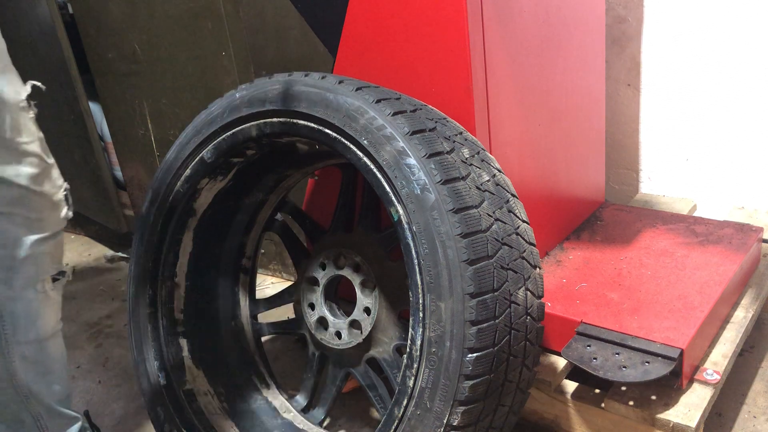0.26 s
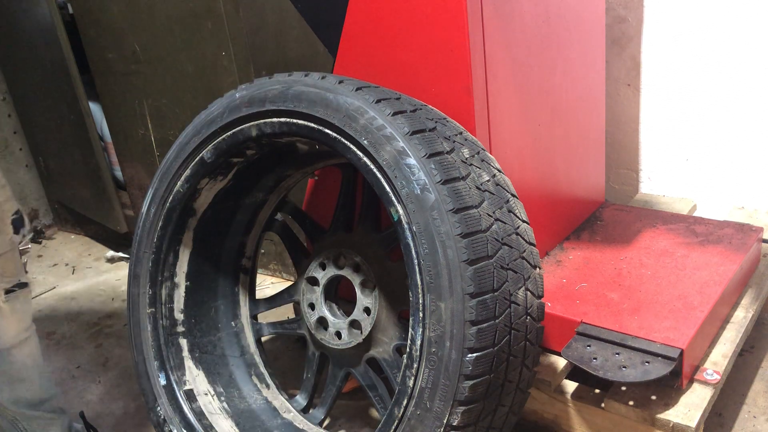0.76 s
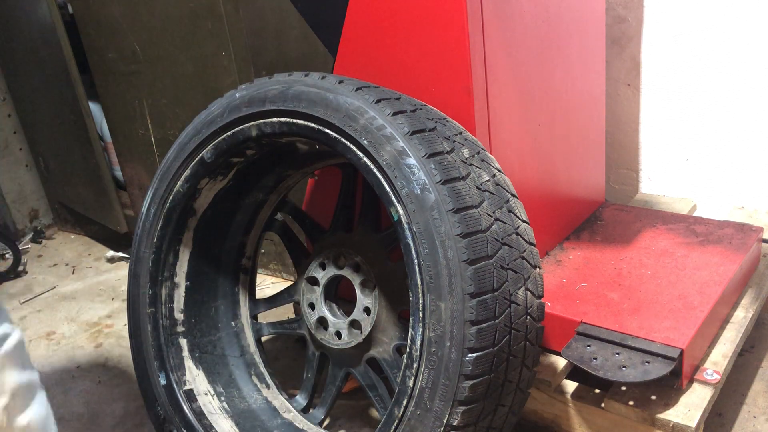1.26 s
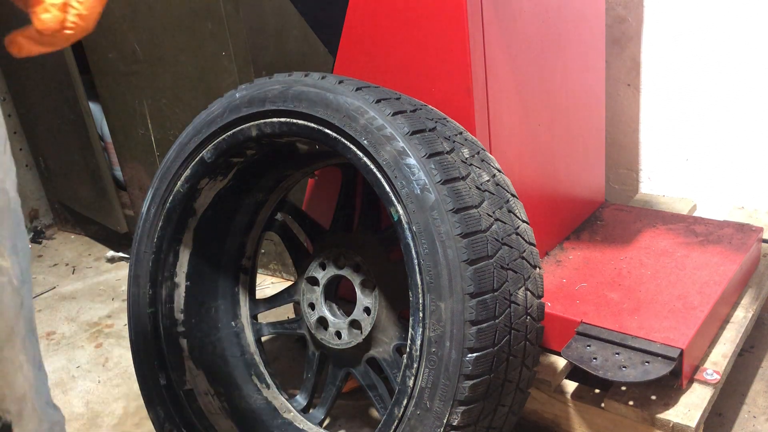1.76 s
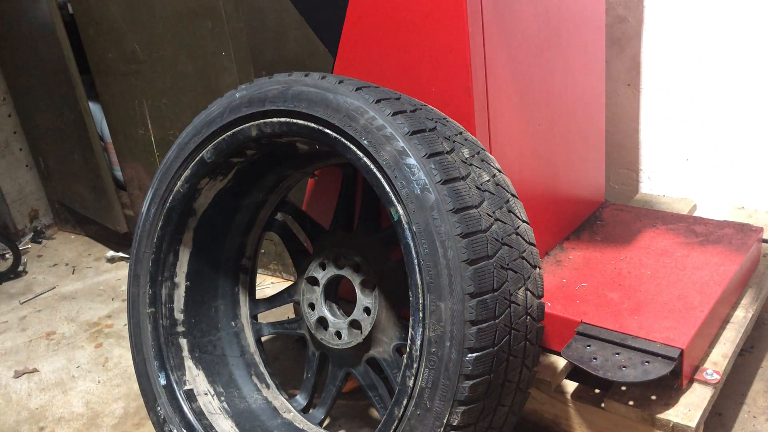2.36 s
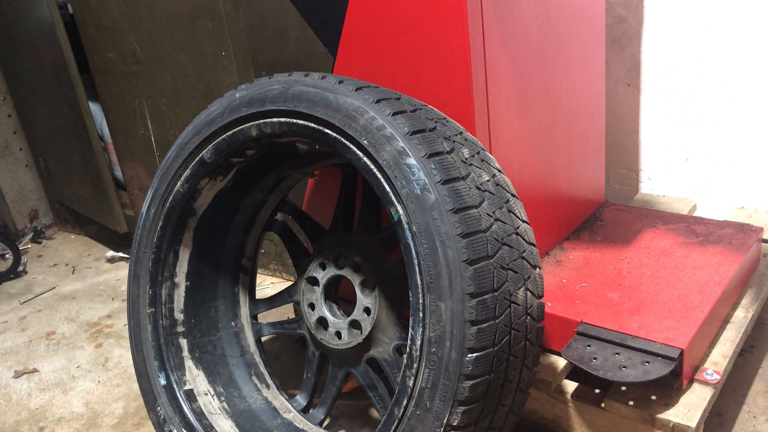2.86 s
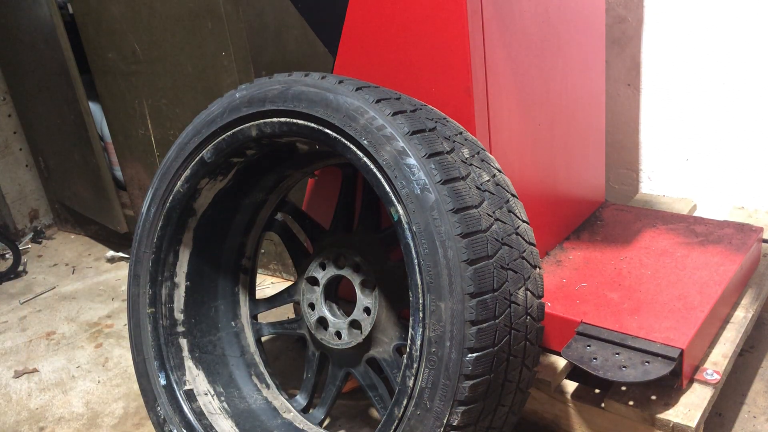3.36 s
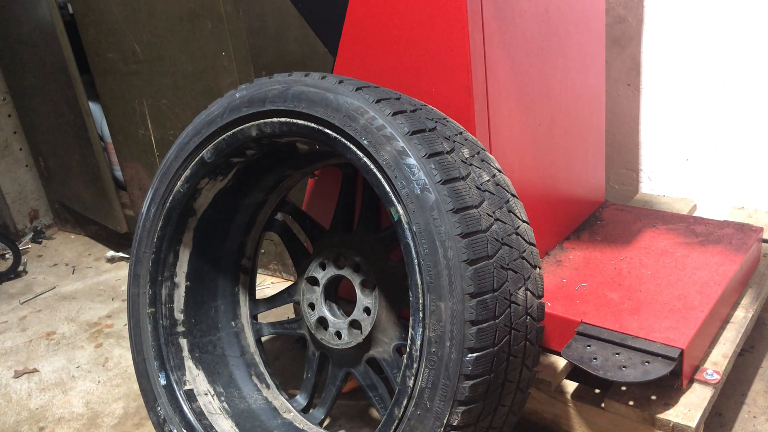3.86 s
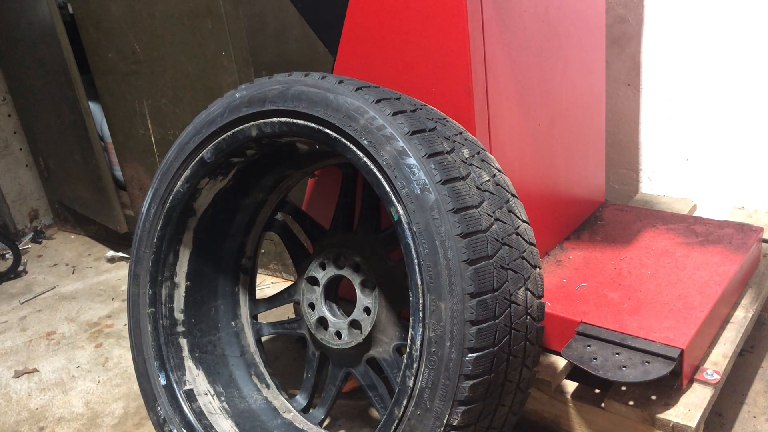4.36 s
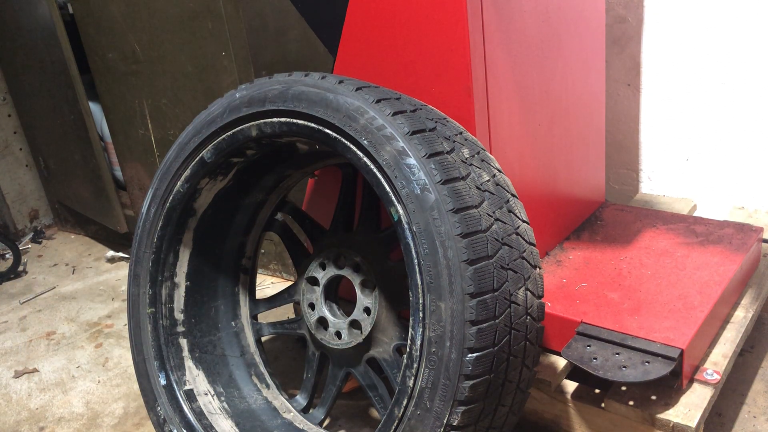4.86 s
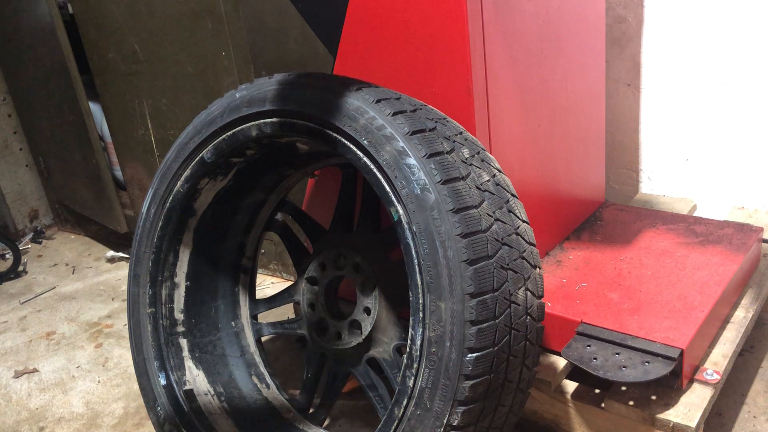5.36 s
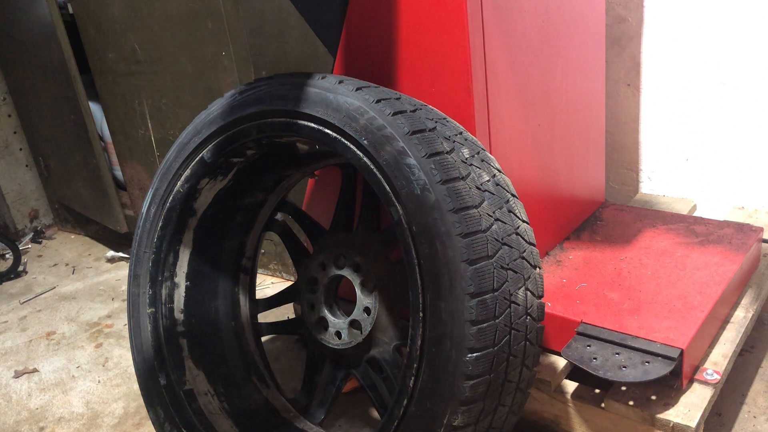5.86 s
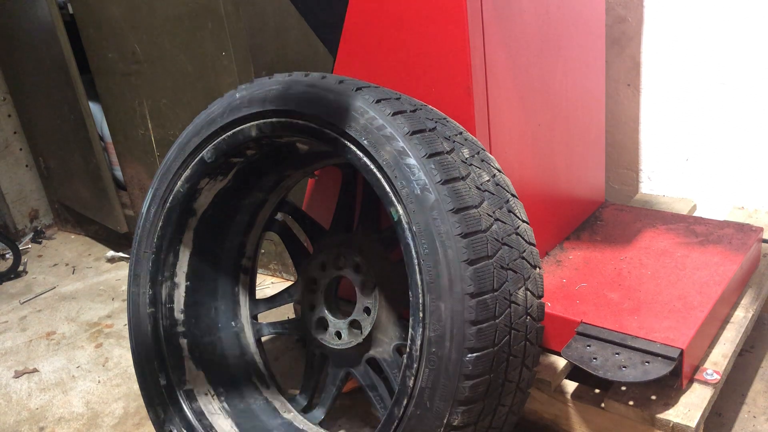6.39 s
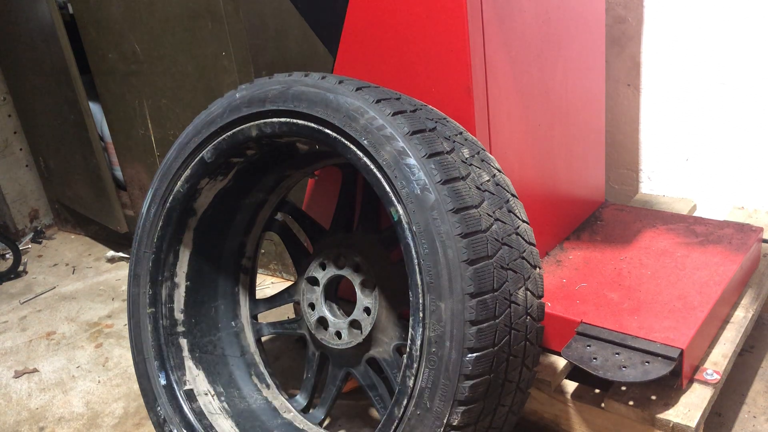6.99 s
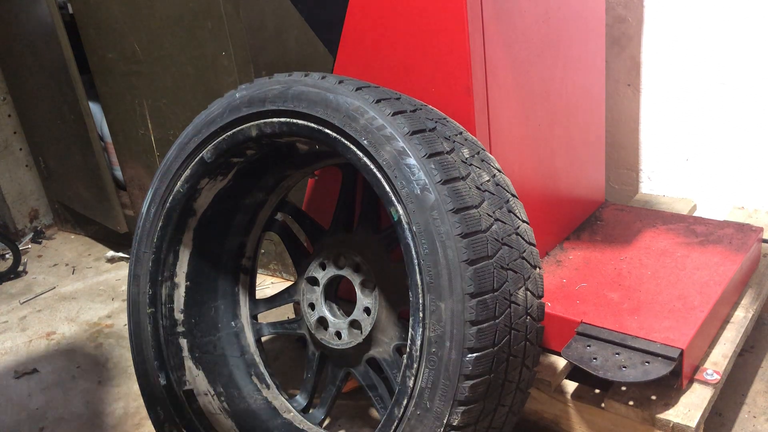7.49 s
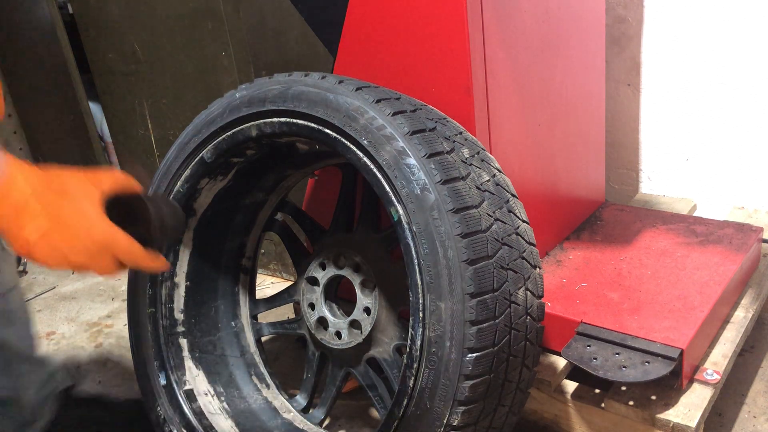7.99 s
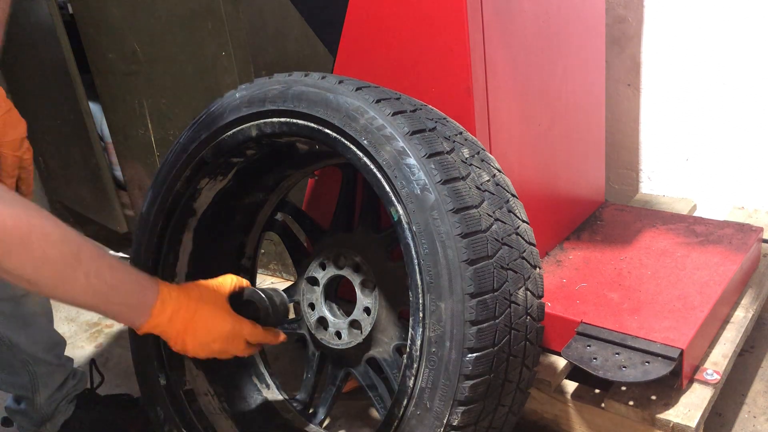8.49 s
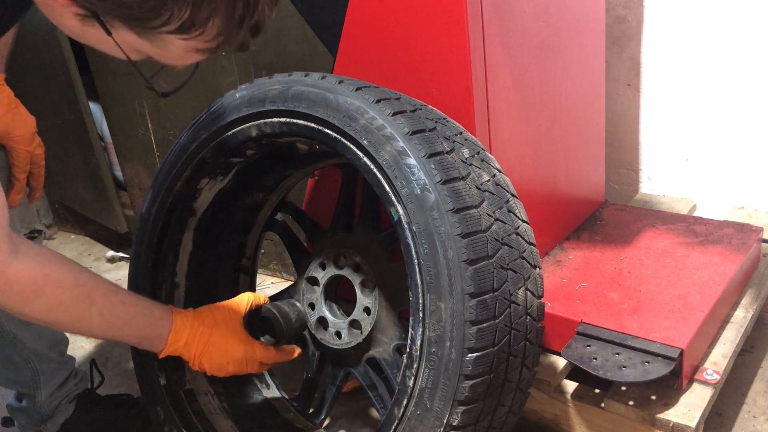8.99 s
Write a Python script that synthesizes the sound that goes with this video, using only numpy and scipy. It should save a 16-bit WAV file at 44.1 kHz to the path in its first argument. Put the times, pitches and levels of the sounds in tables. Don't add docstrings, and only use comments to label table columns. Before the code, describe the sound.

A small concrete workshop heard through a slightly hissy phone microphone, very quiet behind with distant rumble, a wavering low motor hum and rustling clothes. From 0.2 s shoes shuffle on grit, with firm crunching steps at 0.6 and 0.95 s, a sharp stone crack and a brief high rubber squeak just before 0.9 s. Lighter scuffs follow, a drag around 2.4 s, then at 2.8-3.1 s steps bump a pallet and tyre, giving hollow, beating low thuds and knocks. A thin air hiss swells near 3.3 s. Another crisp step cracks stones at 4.1 s; knocks come at 5.35 s and a round low bump at 6.15 s. Crunches at 6.45 and 6.75 s lead to the loudest event, a hard gritty stamp at 7.7 s. Small ticks and scrapes continue until 8.4 s, then only faint background remains.

```python
import sys
import numpy as np
from scipy import signal
from scipy.fft import rfft, irfft
from scipy.io import wavfile
from scipy.ndimage import uniform_filter1d

SR = 44100
rng = np.random.default_rng(int(sys.argv[2]) if len(sys.argv) > 2 else 0)


def natural_amplitude(level_db):
    exponent = np.asarray(level_db, float) / 20
    return 10 ** exponent


def to_wav(s):
    ch = np.atleast_2d(s).T
    pcm = np.round(np.clip(ch, -1, 1) * 32767)
    wavfile.write(sys.argv[1], SR, pcm.astype(np.int16))


N = 407464


def unit(x):
    return x / np.sqrt(np.mean(x ** 2))


def bandpass(x, lo_hz, hi_hz):
    sos = signal.butter(2, [lo_hz, hi_hz], "bandpass", fs=SR, output="sos")
    return signal.sosfilt(sos, x)


def band(x, lo_hz, hi_hz):
    return unit(bandpass(x, lo_hz, hi_hz))


def walk(rate_hz):
    hold = int(SR / rate_hz)
    held = np.repeat(rng.standard_normal(N // hold + 1), hold)
    return unit(uniform_filter1d(held, hold)[:N])


def add(out, s, x):
    i = int(s * SR)
    out[i:i + len(x)] += x[:N - i]


def swells(rows, rest_db):
    t = np.arange(N) / SR
    power = natural_amplitude(rest_db) ** 2
    for s, db, half_s in rows:
        power = power + natural_amplitude(db) ** 2 * np.exp(-2 * ((t - s) / half_s) ** 2)
    return np.sqrt(power)


def grit(density, scatter_db):
    hit = rng.random(N) < density / SR
    size = rng.exponential(size=N)
    return hit * rng.standard_normal(N) * natural_amplitude(scatter_db * size)


# (pitch [Hz], level per Hz [dB])
HISS_SLOPE = [(15, -62), (25, -3.5), (114, -6.5), (145, -7.5), (309, -15.5), (476, -17.5), (695, -20.5),
              (1160, -20.5), (1330, -24), (1940, -21), (2480, -25), (5730, -19), (8140, -23),
              (10400, -26.5), (16000, -23)]
# (pitch [Hz], width [Hz], boost [dB])
CAVITY_PEAKS = [
    (3910, 710, 5),
    (5790, 420, 1.5),
    (10470, 800, 8),
    (3030, 330, -3.5),
    (25.4, 20, -19),
    (13100, 1100, -1.5),
]


def microphone_colour(x):
    f = np.maximum(np.fft.rfftfreq(N, 1 / SR), 1)
    hz, db = np.transpose(HISS_SLOPE)
    colour = np.interp(np.log(f), np.log(hz), db)
    for centre, width, boost_db in CAVITY_PEAKS:
        colour += boost_db / (1 + (2 * (f - centre) / width) ** 2)
    return irfft(rfft(x) * natural_amplitude(colour), N)


def hiss():
    return unit(microphone_colour(rng.standard_normal(N))) * natural_amplitude(-65)


# (loudest at [s], level [dB], half length [s])
RUSTLES = [
    (.3, -67, 0.86),
    (1.36, -68.5, 0.13),
    (3.3, -67, 0.65),
    (4.15, -64.5, 0.38),
    (4.7, -67.5, 0.98),
    (6.8, -65, 0.46),
    (7.87, -64, .08),
    (8.3, -66, 0.14),
]


def clothes(rustle):
    return band(rustle, 456, 7600) * swells(RUSTLES, -70)


# (loudest at [s], level [dB], half length [s])
RUMBLES = [
    (.5, -74.5, 0.25),
    (1.6, -71, 0.77),
    (3.0, -71.5, 0.59),
    (4.4, -71.5, 0.99),
    (6.25, -68.5, 0.34),
    (7.3, -71.5, 1),
    (9.1, -77.5, 0.26),
]


def distant_rumble():
    return band(rng.standard_normal(N), 60, 460) * swells(RUMBLES, -79) * natural_amplitude(1.8 * walk(7.8))


# (loudest at [s], level [dB], half length [s])
HUMS = [
    (.8, -70, .4),
    (2.2, -69, 0.47),
    (2.75, -69, 0.62),
    (4.05, -70, 0.24),
    (5.1, -70.5, 0.45),
    (6.4, -70, .25),
    (7.8, -73, 0.15),
]


def motor_hum():
    tone = np.sin(2 * np.pi * np.cumsum(117 + 4.0 * walk(14)) / SR)
    return tone * natural_amplitude(1.5 * walk(12)) * swells(HUMS, -92)


# (loudest at [s], level [dB], half length [s])
LEAKS = [
    (3.3, -72, 0.7),
    (4.6, -77, .8),
    (8.9, -76, 0.46),
]


def air_leak(rustle):
    return band(rustle, 5050, 5700) * swells(LEAKS, -93)


def background():
    rustle = microphone_colour(grit(9000, 1.5))
    return hiss() + clothes(rustle) + distant_rumble() + motor_hum() + air_leak(rustle)


# (start [s], time to full weight [s], grit level [dB],
# rubber body over grit [dB], fine dust over grit [dB])
STEPS = [(.215, 0.0078, -60, -17, 0), (.592, 0.027, -46, -5, 2), (.62, 0.052, -44, -9, -6.5),
         (.921, 0.031, -43, -7, 0), (.95, 0.041, -46, -4, -5), (1.335, 0.044, -54.5, -1.5, -1),
         (1.64, 0.026, -54, -3, 1), (2.823, 0.029, -44.5, 0, -12), (3.075, 0.0098, -43, -8, -6.5),
         (3.862, .003, -60, 1.5, -20), (4.088, 0.042, -43.5, -6.5, -2), (4.125, 0.034, -46.5, -5, -3),
         (4.58, .006, -61, -4, 0.5), (5.527, 0.0086, -53.5, 2, -7), (5.54, 0.031, -54.5, -1, -2.5),
         (6.34, 0.027, -54.5, -5.5, -6), (6.44, 0.022, -44.5, -5, -6), (6.757, 0.0036, -50.5, -11, 0),
         (7.39, 0.031, -51.5, -11.5, -4), (7.735, 0.011, -46.5, 6, -5), (7.915, 0.0088, -52.5, -4, 0.5),
         (7.925, 0.017, -58.5, -0.5, 0), (8.129, 0.01, -50.5, -10, -8)]
SLIDES = [(.2, 0.062, -65, -3.5, 1), (.42, 0.039, -64.5, -8, -18), (.74, 0.069, -70.5, -4, 2),
          (1.09, 0.069, -74, 4, -10), (1.43, 0.021, -63.5, 0.5, -1), (1.47, .12, -59.5, -2.5, -1.5),
          (2.3, 0.1, -60, -3.5, 2.5), (2.39, 0.083, -50, -10.5, 2), (2.48, 0.066, -57.5, -3, 1),
          (3.18, 0.041, -66, -9, -5), (3.28, 0.11, -56, -3, -15), (3.52, 0.034, -67.5, -4, -8),
          (3.87, 0.037, -60, -5, -3), (4.59, 0.062, -65, -5, -14), (5.22, .05, -68, 1, -7),
          (6.56, 0.045, -68.5, 2, -9), (6.68, 0.036, -52.5, -9, -2.5), (6.72, 0.039, -59.5, -5, -3),
          (6.81, 0.069, -64, -5, -5), (7.24, 0.083, -61, -3, -1), (7.31, 0.092, -59.5, -10, -5),
          (7.8, 0.063, -57, -6, -10), (8.22, 0.094, -58.5, -10, -8), (8.33, 0.073, -67, -6, -4)]
STAMPS = [
    (7.698, 0.012, -38, -4, -8),
    (7.703, 0.024, -29, -8.5, -8),
]
# (start [s], time to full weight [s], grit level [dB],
# rubber body over grit [dB], weight on sole over grit [dB])
TREADS = [(.47, 0.023, -72.5, -14, 5.5), (.93, .02, -55.5, 0, -1), (1.338, .004, -64.5, 8, -5),
          (4.1, 0.036, -56, -6, 1.5), (6.44, 0.0027, -49.5, -4, -3.5), (1.76, 0.035, -77, 6, 7.5),
          (2.29, 0.025, -72.5, 7.5, 6), (2.87, 0.025, -52.5, 7.5, -8), (2.905, 0.013, -57.5, 7, 2),
          (4.02, .008, -60, -3.5, -2), (5.128, .003, -69.5, 7, 11), (5.334, 0.039, -59, 2, -4.5),
          (5.429, 0.013, -60, 2.5, -10), (6.007, .008, -61, -0.5, 1), (6.112, 0.017, -72.5, 12, 13.5),
          (7.151, .003, -61.5, 2.5, 4), (7.754, 0.0089, -46, 1, 5), (8.128, .003, -57.5, 1.5, 7.5)]
# (first contact below full level [dB], fading [dB per s])
STEP, SLIDE, TREAD = (-10, 215), (-12, 164), (-5.5, 228)
STAMP = (-27, 253)
FADE_SHARES = (1.01, 1.14, 1.025, 1.28)


def pressure():
    power, t = np.zeros((4, N)), np.arange(SR // 2) / SR
    moves = []
    for rows, kind in ((STEPS, STEP), (SLIDES, SLIDE), (STAMPS, STAMP)):
        for s, rise, db, body, dust in rows:
            moves.append((s, rise, db, (0, body - 12.5, body, dust), kind))
    for s, rise, db, body, weight in TREADS:
        moves.append((s, rise, db, (0, weight, body, -7.5), TREAD))
    for s, rise, db, mix, (touch_db, fade_db_s) in moves:
        rise = max(rise, .002)
        for layer, rel_db, share in zip(power, mix, FADE_SHARES):
            press = touch_db * np.maximum(1 - t / rise, 0)
            fade = fade_db_s * share * np.maximum(t - rise, 0)
            add(layer, s, natural_amplitude(2 * (db + rel_db + press - fade)))
    return np.sqrt(power)


def crunch(lo_hz, hi_hz, density, tilt_db, count):
    edges = np.geomspace(lo_hz, hi_hz, count + 1)
    out = np.zeros(N)
    for k, (lo, hi) in enumerate(zip(edges, edges[1:])):
        stones = band(grit(density, 2.27), lo, hi)
        out += stones * natural_amplitude(1.25 * walk(35) + tilt_db * k)
    return unit(out)


def shoes():
    stutter = natural_amplitude(0.5 * walk(70))
    grit_gain, weight_gain, body_gain, dust_gain = uniform_filter1d(pressure(), size=130, axis=1) * stutter
    snaps = band(grit(900, 0.93), 1900, 8300)
    coarse = crunch(1854, 6480, 4000, 0.3, count=7) + 0.4 * snaps
    weight = crunch(253.0, 767, 1500, 1.44, count=4)
    body = crunch(644, 1888, 2000, 0.63, count=5)
    dust = crunch(6100, 16000, 9000, -.8, count=5)
    return grit_gain * coarse + weight_gain * weight + body_gain * body + dust_gain * dust


# (time [s], peak level [dB], pitch [Hz])
CRACKS = [(0.2179, -38, 5000), (0.595, -35, 5180), (0.9234, -25.5, 8000), (0.9405, -20.5, 5060),
          (0.9572, -32, 2890), (1.3394, -47, 1740), (1.452, -45, 1910), (2.3932, -41, 6000),
          (2.4294, -39, 6780), (2.4607, -38, 4600), (2.824, -44, 1590), (2.8478, -31, 1570),
          (3.0802, -29, 2820), (3.2201, -48, 5340), (3.385, -38, 2190), (3.4286, -40, 1310),
          (3.8635, -33.5, 2050), (4.025, -44, 2740), (4.0915, -33, 1600), (4.1185, -23, 4000),
          (5.128, -46, 1320), (5.5348, -43, 1840), (6.008, -42, 1710), (6.7618, -23, 3620),
          (7.152, -43, 1350), (7.3931, -33.5, 5900), (7.409, -34, 5450), (7.9192, -31, 6000),
          (8.132, -33, 2860)]


def cracks():
    out, t = np.zeros(N), np.arange(600) / SR
    for s, db, hz in CRACKS:
        snap = 0.42 * rng.standard_normal(len(t)) * np.exp(-t / 0.00028)
        ring = np.sin(2 * np.pi * hz * t) * np.exp(-t / (0.00028 + .35 / hz))
        tick = snap + ring
        add(out, s + .001, natural_amplitude(db) * tick)
        add(out, s + 0.0017, natural_amplitude(db - 18.0) * tick)
    return bandpass(out, 700, 12000)


# (start [s], end [s], first pitch [Hz], last pitch [Hz], level [dB])
SQUEAKS = [
    (.83, .92, 6600, 6450, -62),
    (.78, .92, 8650, 8500, -71),
    (.85, .92, 6600, 5000, -72),
    (1.05, 1.38, 1300, 1400, -73),
]


def squeaks():
    out, slip = np.zeros(N), band(rng.standard_normal(N), 4.5, 300)
    for s, end, first_hz, last_hz, db in SQUEAKS:
        n = int((end - s) * SR)
        tone = np.sin(2 * np.pi * np.cumsum(np.linspace(first_hz, last_hz, n)) / SR)
        blur = .9 + slip[int(s * SR):][:n]
        add(out, s, natural_amplitude(db) * tone * blur * signal.windows.tukey(n, .5))
    return out


def hollow(events, spread):
    out, t = np.zeros(N), np.arange(SR // 2) / SR
    for s, db, hz, t60, push in events:
        pair = np.sin(2 * np.pi * hz * t) + 0.43 * np.sin(2 * np.pi * hz * spread * t)
        swell = np.minimum(t / max(push, .001), 1)
        add(out, s, natural_amplitude(db) * pair * swell * natural_amplitude(-60 * t / t60))
    return out


# (time [s], peak level [dB], pitch [Hz], ring t60 [s], push length [s])
KNOCKS = [(2.843, -36.5, 1573, 0.083, 0.0033), (2.904, -39, 538, 0.29, 0.0084),
          (2.965, -51, 558.5, 0.3, .008), (4.026, -55, 768, 0.091, 0.0045),
          (5.352, -39.5, 870, 0.079, 0.012), (.93, -51, 191, .2, 0.016), (5.342, -47, 1146, .08, .008),
          (5.362, -40, 772, 0.084, 0.0072), (5.442, -48, 1180, 0.061, 0.005),
          (6.772, -52.5, 1060, .14, .005), (7.708, -34, 960, .1, .006), (7.15, -57, 139, 0.18, 0.012),
          (6.012, -61.5, 1743, .35, 0.0046), (6.02, -50, 229, 0.12, 0.0058),
          (6.115, -51.5, 215, 0.15, 0.0065), (7.27, -52, 502, 0.062, .005),
          (7.737, -32.5, 860, 0.11, 0.006), (7.74, -50, 171.3, 0.076, 0.0089),
          (7.928, -47, 1240, 0.089, .007), (7.96, -47, 1140, 0.11, .01), (8.128, -44, 423, 0.15, 0.0059)]
BUMPS = [(2.287, -53.5, 251, 0.12, 0.011), (2.833, -40.5, 220.6, 0.24, 0.014),
         (2.865, -33.5, 97, 0.17, 0.047), (2.916, -33.5, 215.5, 0.2, 0.01),
         (3.006, -48, 205.5, 0.37, 0.012), (3.599, -55, 243, 0.13, 0.011), (5.129, -53, 113, 0.2, 0.015),
         (5.922, -45, 117, 0.23, 0.023), (6.02, -48, 125, 0.26, 0.02), (6.147, -36, 109, 0.23, 0.031),
         (6.269, -53, 119, 0.26, 0.023), (7.151, -49, 211, 0.1, 0.0067), (8.124, -62, 257, 0.14, 0.014)]
THUDS = [
    (2.863, -40, 159, 0.19, 0.015),
    (2.929, -42.5, 162, 0.21, 0.0094),
    (2.979, -44, 136, 0.15, 0.013),
    (5.128, -54, 180, 0.12, 0.011),
]


def pallet_and_tyre():
    return hollow(KNOCKS, 1.2) + hollow(BUMPS, 1.12) + hollow(THUDS, 0.47)


def room(x):
    t, t60_s = np.arange(SR // 2) / SR, 0.22
    low, high = rng.standard_normal((2, len(t)))
    tail = band(low, 82, 3700) * natural_amplitude(-60 * t / t60_s)
    tail += band(high, 3300, 12000) * natural_amplitude(-60 * t / (0.8 * t60_s))
    tail *= np.minimum(t / 0.0033, 1)
    return natural_amplitude(-12.5) * signal.fftconvolve(x, tail / np.sqrt(np.sum(tail ** 2)))[:N]


def scene():
    near = shoes() + cracks() + pallet_and_tyre()
    return (background() + near + room(near) + squeaks())[None]


def band_limit(x):
    return signal.sosfilt(signal.butter(12, 16480, fs=SR, output="sos"), x)


def record(dry):
    sos = signal.ellip(10, .2, 70, 15780, fs=SR, output="sos")
    return band_limit(signal.sosfilt(sos, dry))


dry = scene()
out = record(dry)
to_wav(out)
```